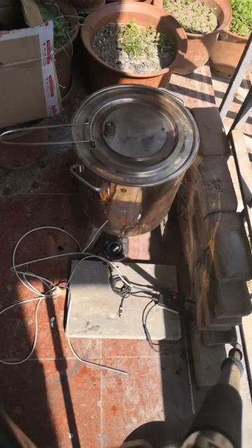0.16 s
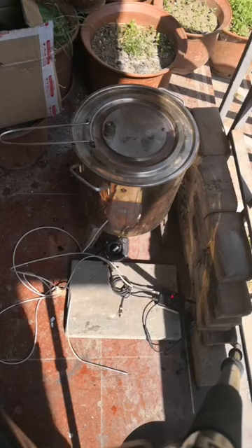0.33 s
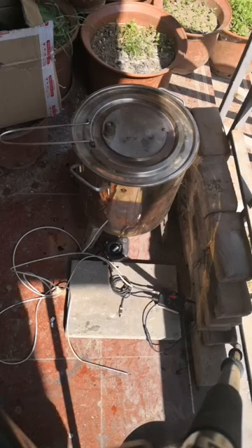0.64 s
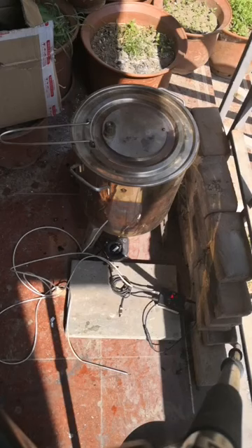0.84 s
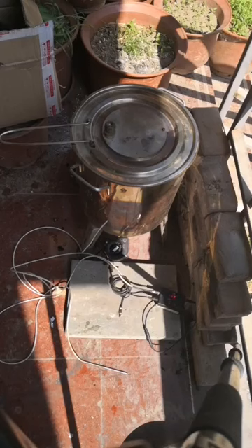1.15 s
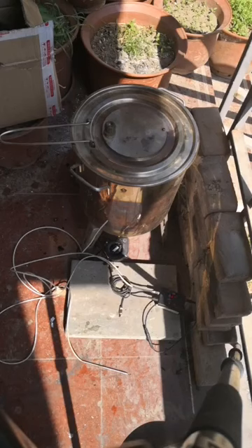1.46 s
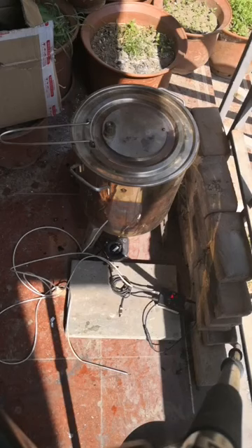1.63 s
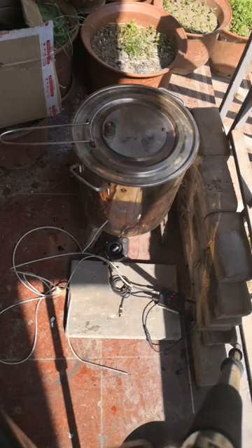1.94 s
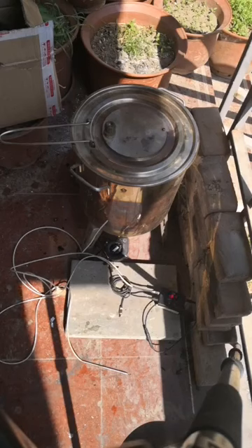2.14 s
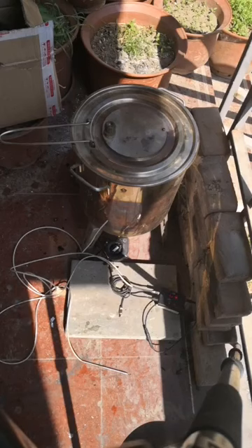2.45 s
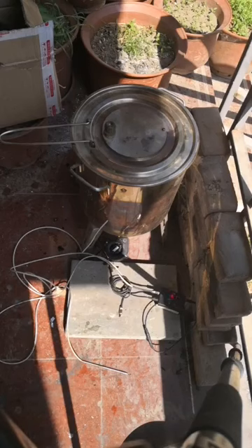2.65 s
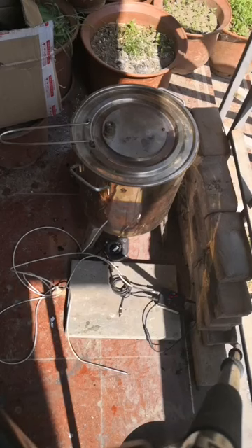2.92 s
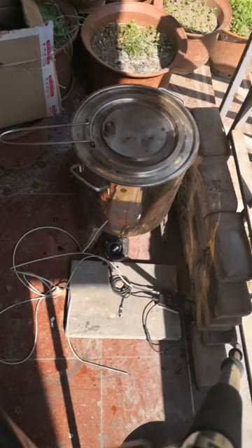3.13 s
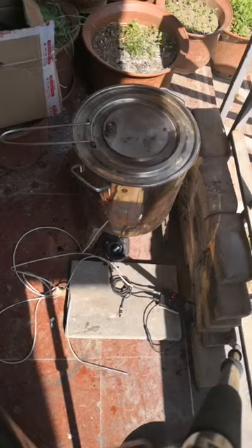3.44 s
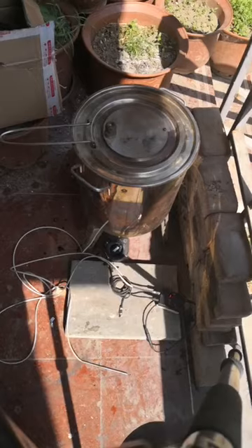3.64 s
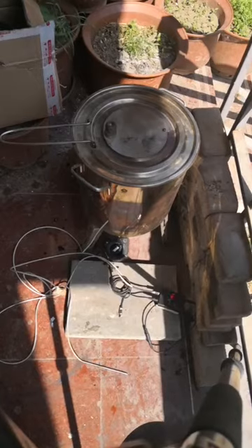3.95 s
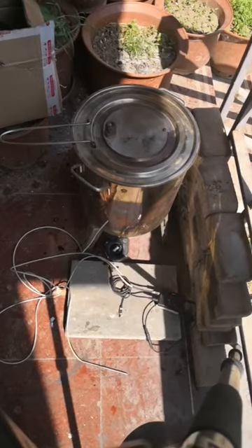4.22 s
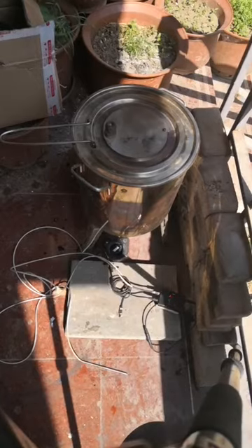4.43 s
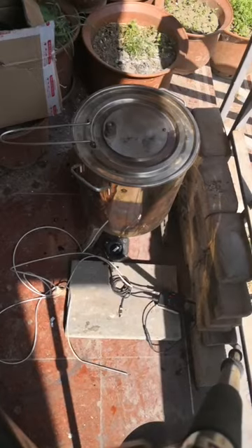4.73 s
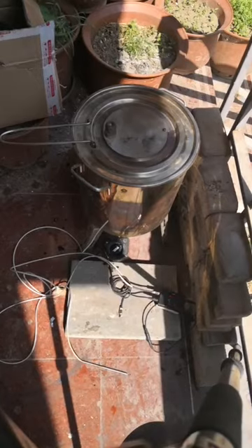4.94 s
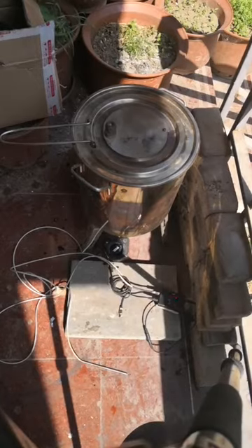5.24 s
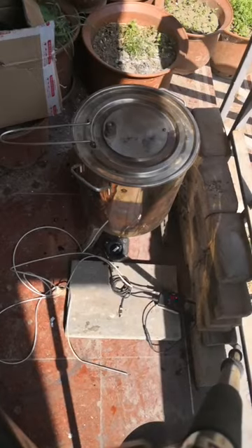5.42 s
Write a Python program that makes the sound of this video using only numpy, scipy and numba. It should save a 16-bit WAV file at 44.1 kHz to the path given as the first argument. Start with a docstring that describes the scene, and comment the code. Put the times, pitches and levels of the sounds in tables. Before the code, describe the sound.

Right at the start, the thin stainless-steel lid of a barbecue smoker slips and clatters down in a loud run of bright, ringing hits, dying away by about 0.8 seconds as it settles. Hands rustle faintly between 1.1 and 2.1 seconds, with a tiny tick near 1.8. From 2.5 to 3 seconds the lid is dragged aside with a gritty scrape, light knocks and dull bumps from the drum. At about 3.3 seconds a metal grate is set down with loud, sharp clinks and a dull thump. It slides on the rim and rings until a hand stills it near 3.9 seconds. The rest is quiet: soft rustles, faint ticks around 4.5 and 5.2, and a tiny squeak and light tap near 5.4. Everything sounds close, with short balcony reflections, over a soft outdoor hiss and a very low hum.

```python
"""The thin stainless-steel lid of a barbecue smoker clatters down on a balcony and is damped by its seat.
It is dragged aside, then a grate is set down, slides and is stilled by a hand. Knocks and scraping grit
ring each part's tones; a crowd of short sheet modes adds the crash, and the drum bumps dully.
Hands rustle in between, with faint ticks and a squeak, over a soft outdoor hiss and a very low hum."""
import sys
import numpy as np
from scipy import signal
from scipy.fft import rfft, irfft
from scipy.io import wavfile
from scipy.ndimage import uniform_filter1d
from numba import njit

SR = 44100
rng = np.random.default_rng(int(sys.argv[2]) if len(sys.argv) > 2 else 0)


def to_wav(sig):
    """Store sig (one row per channel, or 1-D mono) as 16-bit WAV at the path in sys.argv[1].

    Samples outside -1..1 are clipped; the rate is SR.
    """
    pcm = np.clip(np.atleast_2d(sig), -1, 1) * 32767
    pcm = np.round(pcm).astype(np.int16)
    wavfile.write(sys.argv[1], SR, pcm.T)  # frames by channels


N = 246078

# colour of the outdoor hiss: (frequency [Hz], level [dB])
AIR_COLOUR = [(29, -36), (50, -6), (103, -9.5), (140, -15.5), (302, -10), (477, -17), (551, -19),
              (606, -17.5), (1400, -27), (2110, -29.5), (2270, -28.5), (4550, -33.5), (7710, -31),
              (15400, -36.5)]
# fader ride of the hum, with one dip: (time [s], level [dB])
HUM_LEVEL = [(0, -61.5), (3.9, -62), (4.16, -66), (4.5, -63.5), (5.58, -63.5)]
# faint ticks: (time [s], level [dB], start pitch [Hz], end pitch [Hz])
TICKS = [(1.78, -56.5, 5514, 2487), (4.471, -57.5, 6530, 2187), (5.186, -55, 8480, 2302)]
# hands and cloth brushing the parts: (time [s], swell [s], hold [s], level [dB], treble boost [dB])
RUSTLES = [(1.096, 0.045, 0.048, -58, -7.5), (1.176, 0.056, 0.037, -53, -3.5),
           (1.539, 0.043, 0.033, -55, -4), (1.606, 0.026, 0.0079, -50.5, -6),
           (1.663, 0.055, 0.016, -51.5, -6), (2.018, 0.042, 0.071, -57.5, -9.5),
           (2.122, 0.011, 0.0045, -53.5, -15.5), (3.843, 0.03, 0.095, -58, -7.5),
           (3.932, 0.056, .02, -48.5, -11.5), (4.599, 0.03, 0.0086, -57.5, -15.5),
           (4.718, 0.016, 0.0079, -80, 8.5), (4.78, 0.015, .02, -64.5, -9),
           (5.376, 0.022, 0.0085, -46, -17), (5.451, 0.018, .005, -65, -17.5)]
# colour of the rustle: (frequency [Hz], level [dB])
CLOTH_COLOUR = [(290, -13), (500, -5.5), (1430, -8), (2260, -7.5), (5740, -6.5), (7760, 2), (13800, -4),
                (14600, -45), (15400, -69)]
# dull bumps of the drum: (time [s], level [dB], pitch [Hz], t60 [s])
DRUM_BUMPS = [(2.624, -28, 144, 0.027), (2.631, -33, 300, 0.04), (2.659, -25.5, 428, 0.027),
              (3.398, -19, 341.6, 0.054), (3.423, -27, 112, 0.028), (3.549, -32.5, 347, 0.043),
              (3.554, -34, 100, 0.044)]
# colour of the thin sheet: (frequency [Hz], level [dB])
SHEET_COLOUR = [(130, -30.5), (300, -14), (600, -9), (1100, -11), (1900, -0.5), (3000, -7.5), (4200, -11.5),
                (5500, -9), (7500, -10.5), (10000, -9.5), (12000, -16), (14500, -25.5)]
# ring time of the sheet: (frequency [Hz], t60 [s])
SHEET_T60 = [(200, .5), (1000, 0.37), (3000, 0.06), (8000, 0.21), (14000, 0.29)]
# clear tones of each part: (frequency [Hz], level [dB], t60 [s])
GRATE_TONES = [(433, -35.5, 1.3), (510.1, -31.5, 2.04), (873, -35.5, 2.1), (1014, -34.5, 1.55),
               (1284, -30, 1.6), (1546, -31, 0.78), (1718, -10.5, 0.08), (1880, -3.5, 0.12),
               (2750, -23, 1.4), (3000, -22, 0.58), (3181, -1, 0.2), (3360, -24, .4), (4145, -17.5, 0.65),
               (4746, -0.5, 0.19), (4900, -18, 0.093), (5680, -44.5, .4), (7273, -18, 0.45),
               (7800, -11.5, 0.36), (8650, -18, 0.11), (9100, -16.5, 0.33), (9938, -11.5, 0.25),
               (10700, -19.5, 0.33), (12400, -29, .3)]
LID_TONES = [(179.7, -29, 1.6), (252, -23.5, 1.5), (312.6, -22.5, 1.2), (337, -22.5, 4), (380, -24, 1.5),
             (601.6, -6.5, 0.5), (629.2, -14, 1.6), (712.4, -15, 2.7), (726, -16.5, 1.6),
             (838, -15.5, 0.57), (1097, -18.5, 0.21), (1183, -16, 1), (1334, -15, 0.9), (1502, -14.5, 1.1),
             (1579, -16, 0.59), (1714, -11.5, 2.3), (1783, -14, 1), (1893, -16, 0.74), (1996, -12, 0.71),
             (2232, -11, 1.6), (2424, -16.5, 2), (2690, -12.5, 0.74), (2785, -13.5, 0.8),
             (3045, -15.5, 0.8), (3056, -14.5, 0.6), (3667, -17, 0.75), (4280, -13, 0.6),
             (4724, -14.5, 0.65), (4910, -13, 0.47), (5066, -17, 0.28), (7425, -11, 0.46)]
# hits on each part: (time [s], level [dB], brightness [dB], favoured pitch [Hz], bass boost [dB])
GRATE_HITS = [(3.326, -18.5, 8.5, 7290, 18), (3.344, -12, -3, 1790, 11), (3.368, 2.5, -2, 7850, 5.5),
              (3.382, 0.5, -5, 3230, -4), (3.398, -4, 0, 4700, -33.5), (3.407, -18.5, 19, 1896, -16),
              (3.469, -25, 22, 7500, 11.5), (3.531, -14.5, 7.5, 7880, 1), (3.554, -45, -3, 2980, 31)]
LID_HITS = [(.099, 0.5, -3.5, 1870, -5.5), (.115, -0.5, -7, 1896, 0), (.132, -7.5, -16, 582, 5.5),
            (.159, -12.5, -19.5, 2940, 5.5), (.187, -1.5, -2.5, 4820, 3), (.202, -3, 2, 560, 0.5),
            (.224, -2.5, -9, 1920, 0.5), (.237, -5, -13, 2330, -0.5), (.305, -5, 9.5, 1650, -2),
            (.319, 0, 3, 1984, -20.5), (.403, -18.5, 16, 710, 9.5), (.433, -8.5, 8, 6800, 6.5),
            (.514, -13, 4, 7900, 3.5), (.559, -16.5, 5, 4700, -8), (.619, -11.5, 15, 9260, -7),
            (.63, -13.5, 4, 5090, -20), (2.482, -35.5, 15, 1900, -13), (2.527, -36, 21, 5000, -19),
            (2.555, -29, 23.5, 6190, -20), (2.612, -23, 24, 9400, 14.5), (2.627, -19.5, 7, 1800, -32),
            (2.723, -32.5, 22, 6450, -8), (2.778, -28.5, 22, 9750, -5), (2.817, -19.5, -5, 716, -4.5),
            (4.858, -44.5, -12, 1106, 4.5), (5.392, -36.5, 3, 726, 6.5)]
# slides on the rim, one list per stroke: (time [s], level [dB], treble boost [dB])
GRATE_SLIDES = [
    [(3.31, -100, -1), (3.324, -58, 8), (3.378, -27, 5.5), (3.414, -24, 3), (3.448, -41, 1),
     (3.5, -39, 9.5), (3.544, -48.5, 19), (3.75, -58.5, -11)],
]
LID_SLIDES = [
    [(0.0, -38, 0), (0.05, -49, 3), (0.09, -48.5, -1.5)],
    [(2.47, -74.5, 4), (2.488, -46.5, -2), (2.554, -46, 13), (2.6, -36.5, 7.5), (2.62, -21, 3.5),
     (2.69, -49.5, -1.5), (2.74, -44.5, 14), (2.782, -37.5, 11), (2.85, -44.5, -3), (2.865, -37, 10),
     (2.96, -43, 10.5), (3.056, -58, 8.5), (3.12, -83, 0.5)],
]
# a hand closes on the grate: (time [s], extra loss near 700 Hz [dB/s]); negative counts as none
GRATE_GRIP = [(0, -5), (3.87, 284)]
# the lid falls, lands, is seated, let go, held, eased, held: (time [s], extra loss near 700 Hz [dB/s])
LID_GRIP = [(0, 37), (.29, 405), (.335, 138), (.66, 84), (2.0, 310), (2.8, 153), (2.98, 292)]


def amp(db):
    """Gain from dB."""
    return 10 ** (np.asarray(db) / 20)


def unit_rms(x):
    """Scale to rms 1."""
    return x / np.sqrt(np.mean(x ** 2) + 1e-20)


def filtered(x, order, hz, kind):
    """Butterworth filter."""
    return signal.sosfilt(signal.butter(order, hz, kind, fs=SR, output="sos"), x)


def automation(rows, outside=None):
    """One curve per column, ramping between the breakpoints."""
    times, *columns = np.transpose(rows)
    return [np.interp(np.arange(N) / SR, times, column, outside, outside) for column in columns]


def at_hz(points, hz):
    """Read a curve along a log frequency axis."""
    frequencies, values = np.transpose(points)
    return np.interp(np.log(hz), np.log(frequencies), values)


def coloured(x, colour):
    """EQ a signal with a colour curve; rms 1."""
    hz = np.maximum(np.arange(N // 2 + 1) * SR / N, 1)
    return unit_rms(irfft(rfft(x) * amp(at_hz(colour, hz)), N))


def tilted(x, bass_db, treble_db, bass_hz, treble_hz):
    """Three-band EQ whose bass and treble gains can move."""
    low = filtered(x, 2, bass_hz, "low")
    mid = filtered(x, 2, [bass_hz, treble_hz], "band")
    high = filtered(x, 2, treble_hz, "high")
    return mid - low * amp(bass_db) - high * amp(treble_db)


def grains(per_s, spread_db=3.0):
    """Random clicks of uneven size; rms 1."""
    sizes = amp(spread_db * np.minimum(rng.exponential(1, N), 5)) * rng.choice([-1, 1], N)
    return unit_rms(sizes * (rng.random(N) < per_s / SR))


def background(hum_hz=29.0, hiss_db=-66.5):
    """The bed: outdoor hiss and a hum at the bottom of hearing."""
    hum_rms = amp(automation(HUM_LEVEL)[0])
    hum = np.sqrt(2) * hum_rms * np.sin(2 * np.pi * hum_hz * np.arange(N) / SR)
    return hum + amp(hiss_db) * coloured(rng.standard_normal(N), AIR_COLOUR)


def balcony(x, wet_db, t60):
    """Floor and walls send back a short diffuse tail."""
    t = np.arange(int(.4 * SR)) / SR
    tail = rng.standard_normal(len(t)) * amp(-60 * t / t60) * (t > .004)
    tail = signal.lfilter([.6], [1, -.4], tail)   # soften the top
    return x + amp(wet_db) * signal.fftconvolve(x, tail / np.sqrt(np.sum(tail ** 2)))[:N]


def squeak(start_s=5.325, length_s=0.06, hz=937, level_db=-64.5, octave_db=-13.5):
    """A short faint tone with its octave."""
    t = np.arange(N) / SR - start_s
    phase = 2 * np.pi * hz * t
    envelope = np.sin(np.pi * np.clip(t / length_s, 0, 1)) ** .5
    return amp(level_db) * envelope * (np.sin(phase) + amp(octave_db) * np.sin(2 * phase))


def ticks(glide_s=0.019, decay_s=0.087, ring_hz=4430, ring_db=4, ring_t60=0.35):
    """A rough band of noise dives in pitch while a narrow ring lingers."""
    out, t = np.zeros(N), np.arange(12000) / SR
    for s, db, start_hz, end_hz in TICKS:
        rough = uniform_filter1d(rng.standard_normal((2, len(t))), size=10) * np.sqrt(10)
        hz = end_hz + (start_hz - end_hz) * np.exp(-t / glide_s)
        dive = rough[0] * np.sin(2 * np.pi * np.cumsum(hz) / SR) * np.exp(-t / decay_s)
        flutter = unit_rms(uniform_filter1d(rough[1], size=90))
        linger = flutter * np.sin(2 * np.pi * ring_hz * t) * amp(ring_db - 60 * t / ring_t60)
        i = round(s * SR)
        out[i:i + len(t)] += amp(db - 3) * (dive + linger * np.minimum(t / 0.035, 1))
    return out


def rustles(swell_db=13, fade_db_per_s=413):
    """Soft dense grains of skin and cloth: each brush swells, holds and fades."""
    t, level, treble_db = np.arange(N) / SR, np.zeros(N), np.zeros(N)
    for s, swell_s, hold_s, db, boost_db in RUSTLES:
        rise_db = swell_db * np.minimum((t - s) / swell_s - 1, 0)
        fade_db = fade_db_per_s * np.maximum(t - s - swell_s - hold_s, 0)
        level += (t > s) * amp(db + rise_db - fade_db)
        treble_db[t > s] = boost_db
    cloth = coloured(grains(per_s=23000), CLOTH_COLOUR)
    return level * tilted(cloth, -1.4, treble_db, bass_hz=1760, treble_hz=5130)


def drum_bumps():
    """Low modes of the smoker's drum, pushed softly."""
    out, t = np.zeros(N), np.arange(12000) / SR
    attack = 1 - np.exp(-t / 0.001)
    for s, db, hz, t60 in DRUM_BUMPS:
        i = round(s * SR)
        out[i:i + len(t)] += amp(db - 60 * t / t60) * np.sin(2 * np.pi * hz * t) * attack
    return filtered(out, 4, 65, "high")


def mode_bank(hz, gain, t60):
    """Frequency, gain and pole of each mode."""
    return hz, gain, amp(-60 / (t60 * SR)) * np.exp(2j * np.pi * hz / SR)


def clear_tones(rows, trim_db):
    """The modes of a part that sing out as tones."""
    hz, db, t60 = np.transpose(rows)
    return mode_bank(hz, amp(db + trim_db), t60)


def sheet_modes(count):
    """The crash of thin sheet: short modes evenly crowded over the whole range."""
    hz = np.linspace(200, 15000, count) + rng.normal(0, 8, count)
    t60 = at_hz(SHEET_T60, hz) * amp(rng.normal(0, 1.6, count))
    gain = unit_rms(amp(at_hz(SHEET_COLOUR, hz)) / np.sqrt(t60)) / np.sqrt(count)
    return mode_bank(hz, gain, t60)


def damping(rows):
    """A hand or seat chokes the ring: loss per sample, held from row to row."""
    times, db_per_s = np.transpose(rows)
    row = np.maximum(np.searchsorted(times, np.arange(N) / SR) - 1, 0)
    return 1 - amp(-np.maximum(db_per_s[row], 0) / SR)


@njit
def ring(force, spot, reach, poles, grip):
    """Ring the modes; reach[mode, spot] sets the drive, and the grip chokes high modes hardest."""
    out = np.zeros(len(force))
    for m in range(len(poles)):
        state = 0j
        choke = np.sqrt(np.angle(poles[m]) * 10)   # 1 near 700 Hz
        for n in range(len(force)):
            if force[n] != 0 or abs(state.real) + abs(state.imag) > 1e-7:
                state = state * poles[m] * (1 - choke * grip[n]) + force[n] * reach[m, spot[n]]
                out[n] += state.imag
    return out


def strike(hits, tones, sheet, grip, trim_db, favour_db=9, favour_octaves=.09):
    """Each hit knocks the tones and chatters on the sheet, on a spot that favours its own pitch."""
    knock, chatter, spot = np.zeros(N), np.zeros(N), np.zeros(N, int)
    t = np.arange(2000) / SR
    attack = np.minimum(t / 0.0015, 1)
    for k, (s, _, bright_db, *_) in enumerate(hits):
        contact_s = 0.0088 * 2 ** (bright_db / 14)   # brighter, glancing hits chatter longer
        burst = rng.standard_normal(len(t)) * attack * np.exp(-t / contact_s)
        i = round(s * SR)
        knock[i] = 1
        chatter[i:i + len(t)] = burst / np.sqrt(contact_s * SR / 2)
        spot[i:] = k
    _, db, bright_db, favoured_hz, bass_db = np.transpose(hits)
    out = 0
    for force, (hz, gain, poles) in ((knock, tones), (chatter, sheet)):
        bass = np.clip(np.log2(1500 / hz), 0, 1)
        treble = np.clip(np.log2(hz / 3500), 0, 1)
        colour_db = np.outer(bass, bass_db) + np.outer(treble, bright_db)
        colour_db += favour_db * np.exp(-(np.log2(hz[:, None] / favoured_hz) / favour_octaves) ** 2)
        scatter, polarity = rng.normal(0, 1, (len(hits), 2, len(hz))).transpose(1, 2, 0)
        reach = gain[:, None] * amp(db + trim_db + colour_db + 3 * scatter) * np.sign(polarity)
        out += ring(force, spot, reach, poles, grip)
    return out


def strokes(slides):
    """Gain and treble boost of separate strokes, silent between them."""
    level = sum(amp(automation(rows, outside=-200)[0]) for rows in slides)
    return level, automation(np.vstack(slides))[1]


def scrape(level, treble_db, tones, grip, bass_db, ring_db, grit_db):
    """Dense grit under the stroke drives the tones and is heard in the colour of the sheet."""
    hz, gain, poles = tones
    friction = tilted(grains(per_s=5000), bass_db, treble_db, bass_hz=1000, treble_hz=4500)
    force = friction * level * (level > 1e-6)
    grit = coloured(force, SHEET_COLOUR) * np.std(force)
    spot = np.arange(N) // 1500   # the contact wanders and finds other modes
    reach = gain[:, None] * amp(rng.normal(0, 4, (spot[-1] + 1, len(hz))).T)
    return amp(ring_db) * ring(force, spot, reach, poles, grip) + amp(grit_db) * grit


def grate(sheet):
    """The grate clinks down, slides on the rim and rings until a hand closes on it."""
    tones, grip = clear_tones(GRATE_TONES, trim_db=-13.5), damping(GRATE_GRIP)
    drag, treble_db = strokes(GRATE_SLIDES)
    clinks = strike(GRATE_HITS, tones, sheet, grip, trim_db=-23.5)
    return clinks + scrape(drag, treble_db, tones, grip, bass_db=7.0, ring_db=-29.0, grit_db=-9.5)


def lid_rattle(trim_db=-10.5, rise_s=0.0091, fall_s=.035):
    """Envelope of the lid rattling on the rim after each hit."""
    power, t = np.zeros(N + SR), np.arange(SR // 2) / SR
    swell = (1 - np.exp(-t / rise_s)) * np.exp(-t / fall_s)
    for s, db, *_ in LID_HITS:
        i = round(s * SR)
        power[i:i + len(t)] += (amp(db + trim_db) * swell) ** 2
    return np.sqrt(power[:N])


def lid(sheet):
    """The lid slips, clatters down, is choked by its seat and is later dragged aside."""
    tones, grip = clear_tones(LID_TONES, trim_db=-7.0), damping(LID_GRIP)
    drag, treble_db = strokes(LID_SLIDES)
    clatter = strike(LID_HITS, tones, sheet, grip, trim_db=-14.0)
    rub = drag + lid_rattle()
    return clatter + scrape(rub, treble_db, tones, grip, bass_db=-2.5, ring_db=-34.5, grit_db=-10.5)


def scene():
    """Close-up steel and handling in the balcony's reverb, over the bed; mono."""
    sheet = sheet_modes(count=700)
    steel = filtered(lid(sheet) + grate(sheet), 6, 165, "high")   # small parts radiate no deep bass
    close = steel + drum_bumps() + rustles() + ticks() + squeak()
    return (balcony(close, wet_db=-8.5, t60=0.2) + background())[None]


def record(dry):
    """The microphone port lifts the treble near its resonance; the top fades above 14 kHz and is cut."""
    port_hz, width_hz, cutoff_hz = 7930, 2000, 15600
    port = signal.lfilter(*signal.iirpeak(port_hz, port_hz / width_hz, fs=SR), dry)
    soft = filtered(dry + amp(-3.5) * port, 8, 14300, "low")
    return signal.sosfilt(signal.cheby2(12, 70, cutoff_hz, fs=SR, output="sos"), soft)


dry = scene()
out = record(dry)
to_wav(out)
```